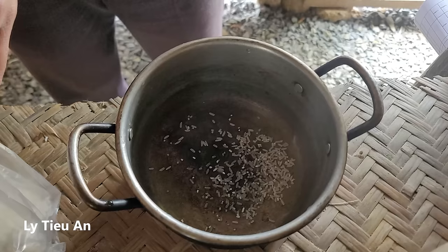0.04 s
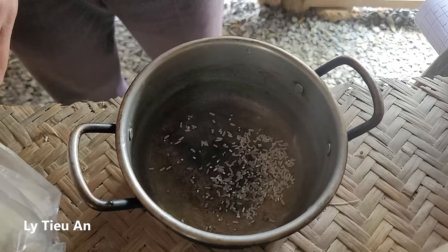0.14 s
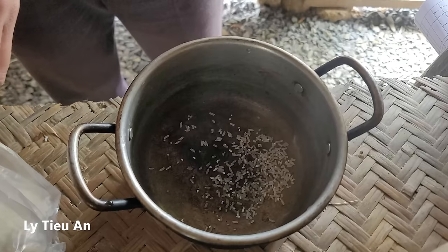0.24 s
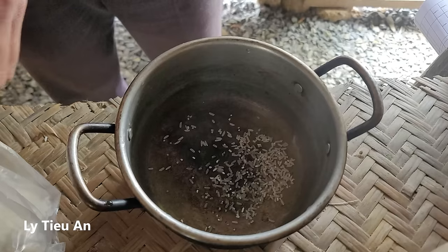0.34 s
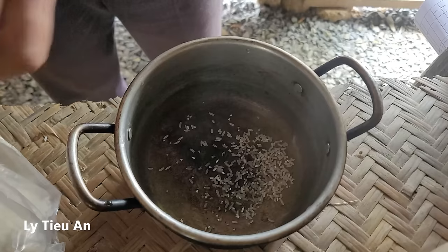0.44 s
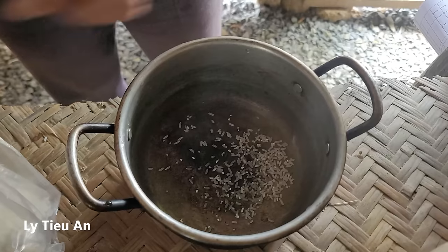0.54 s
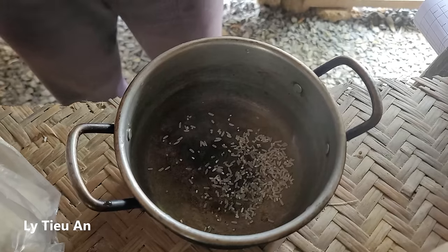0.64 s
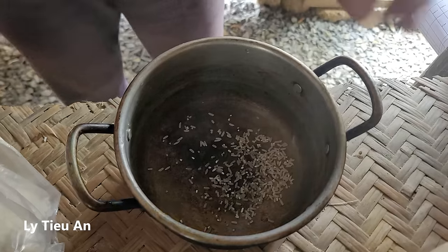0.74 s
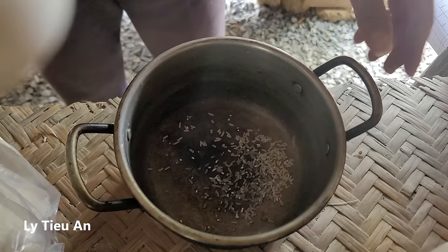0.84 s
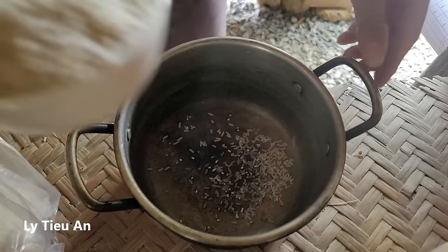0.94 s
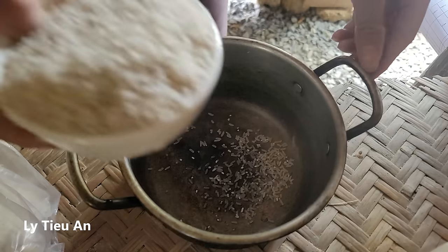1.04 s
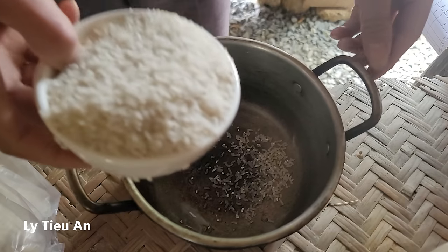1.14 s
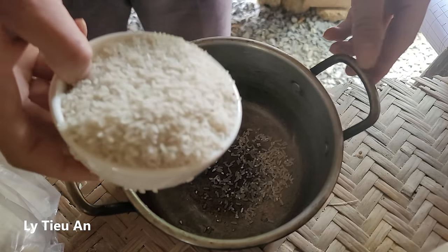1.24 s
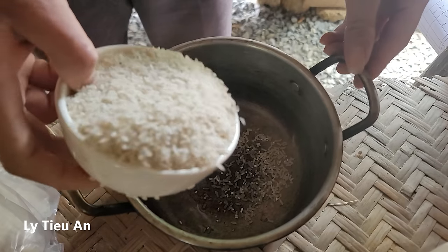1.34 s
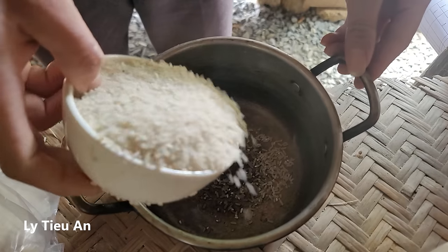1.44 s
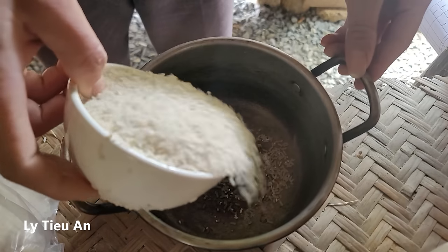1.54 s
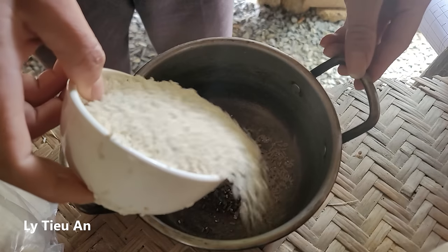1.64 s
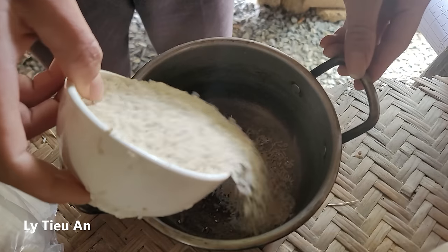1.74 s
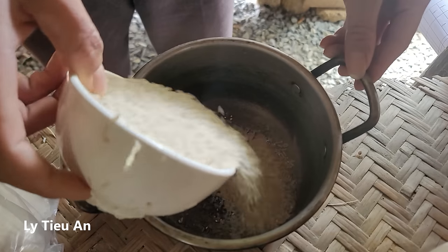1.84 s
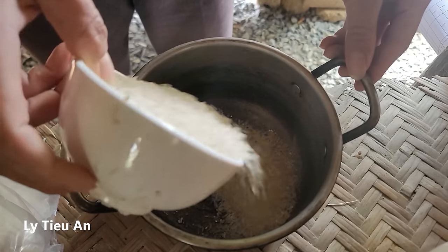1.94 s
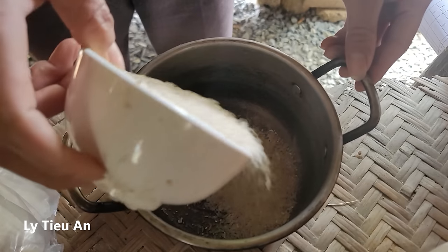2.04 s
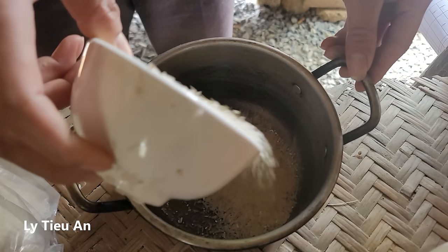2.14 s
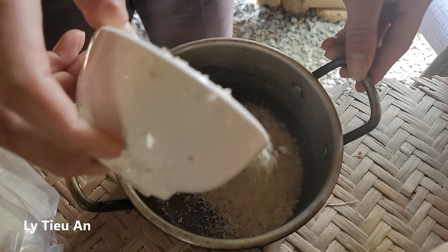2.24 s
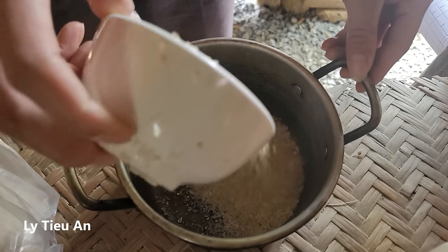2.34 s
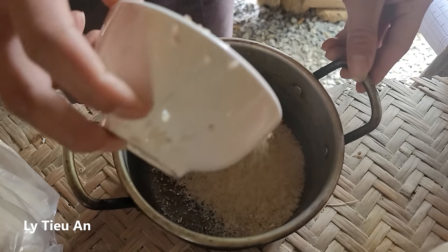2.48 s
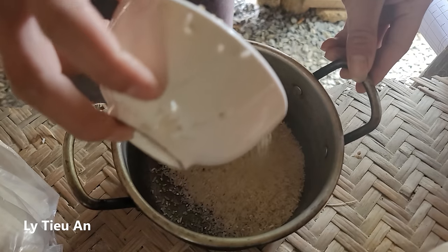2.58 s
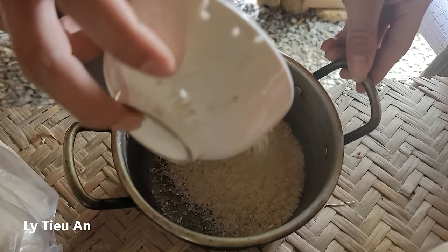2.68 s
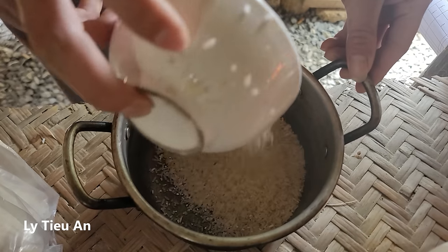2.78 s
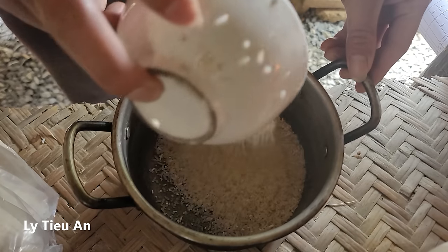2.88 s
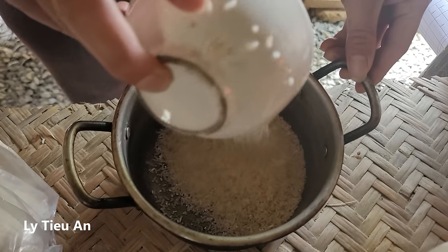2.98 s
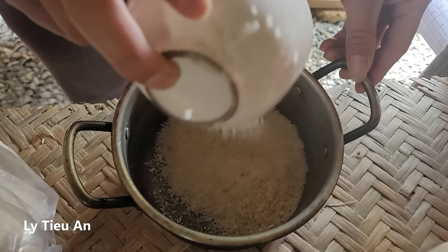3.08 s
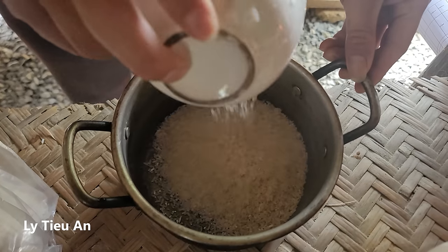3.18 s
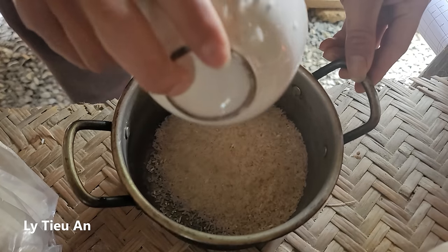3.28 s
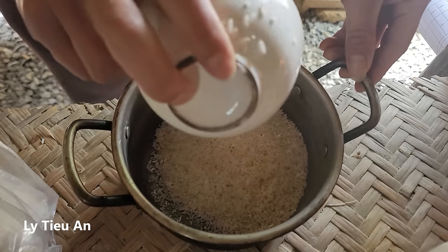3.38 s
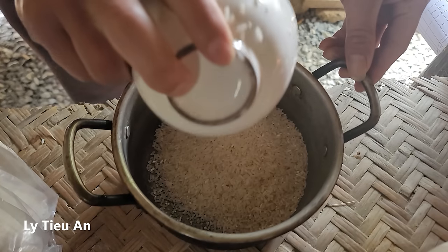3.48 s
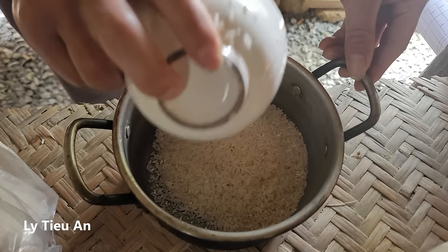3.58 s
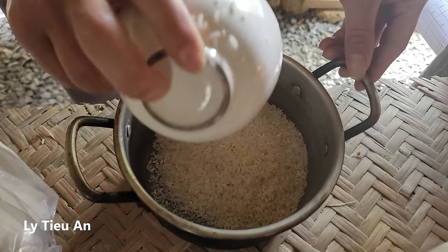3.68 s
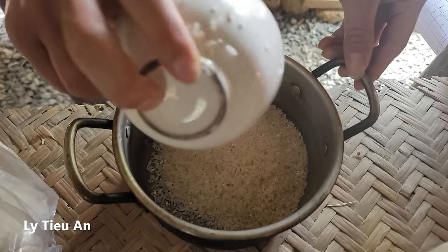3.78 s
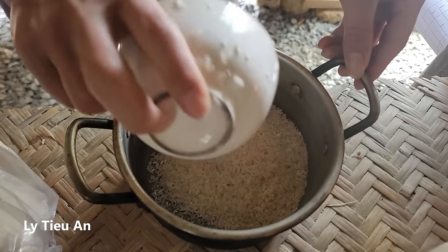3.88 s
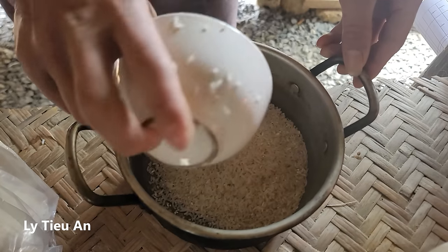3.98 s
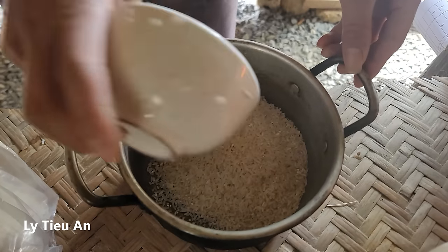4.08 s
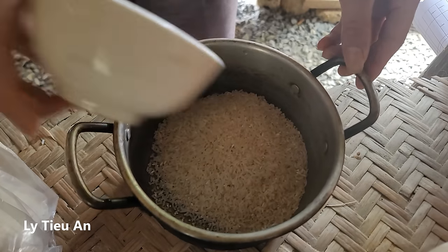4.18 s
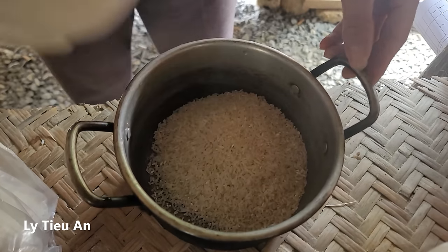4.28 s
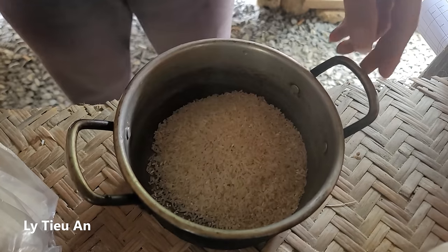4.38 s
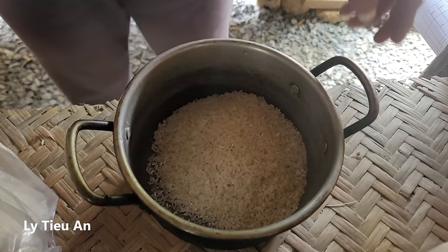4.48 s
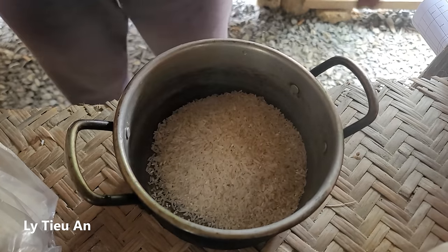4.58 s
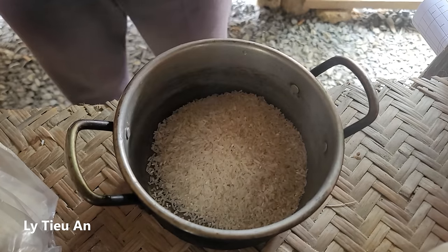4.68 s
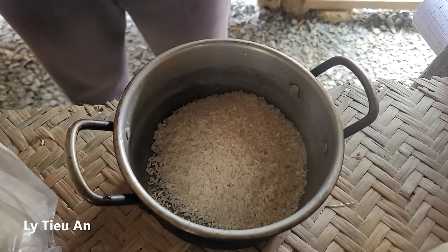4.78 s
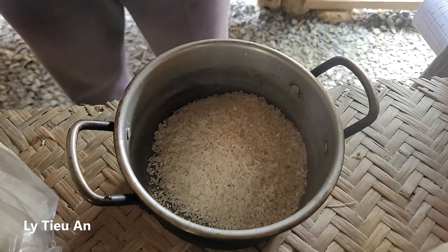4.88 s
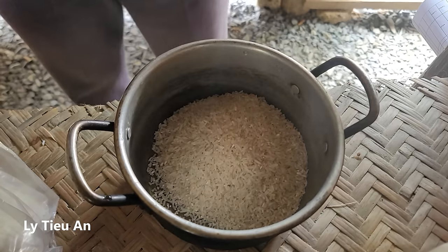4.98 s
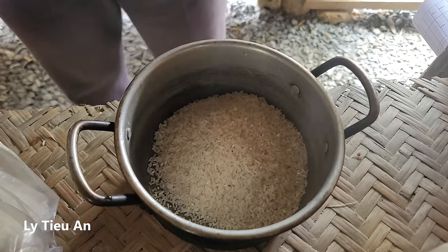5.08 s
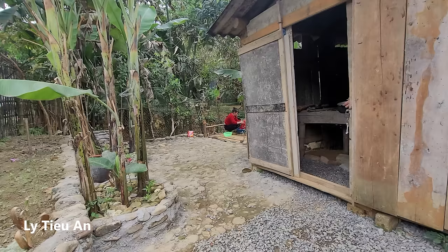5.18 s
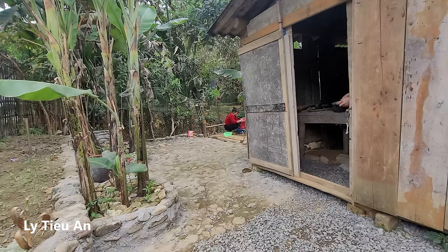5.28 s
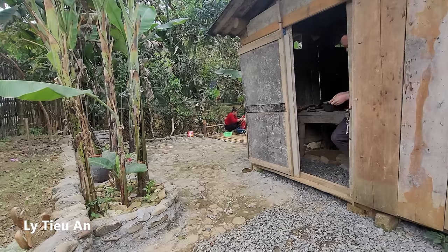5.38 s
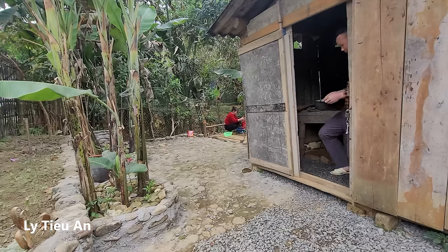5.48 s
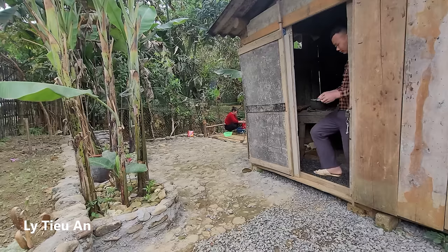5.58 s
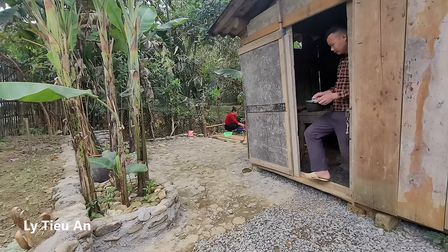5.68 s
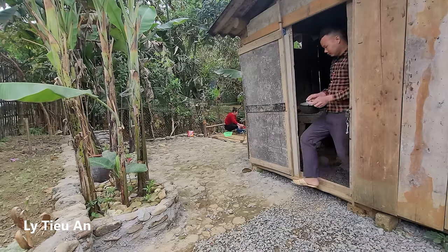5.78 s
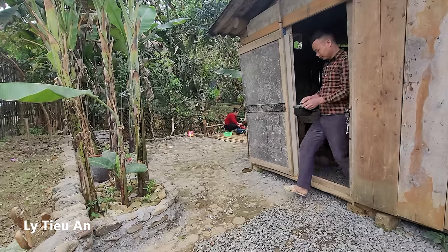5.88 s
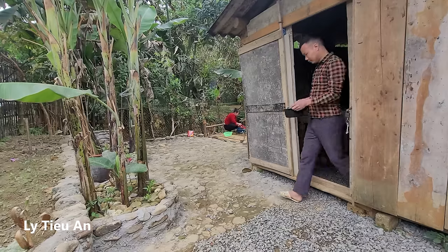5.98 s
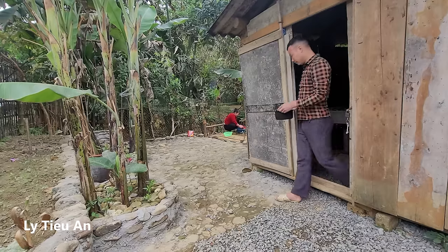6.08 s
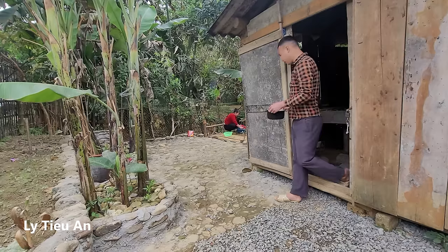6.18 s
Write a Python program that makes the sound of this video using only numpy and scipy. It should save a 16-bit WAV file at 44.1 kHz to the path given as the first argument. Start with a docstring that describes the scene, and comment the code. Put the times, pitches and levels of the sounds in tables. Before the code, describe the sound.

From 0 to 1.4 s, a quiet wooden hut: low wavering rumble, thin air, tiny rustling ticks, faint far hoots and a distant bird repeating a thin whistle and hoarse note. A dull table knock comes at 1.35 s. At about 1.45 s dry rice strikes bare thin metal, a loud, bright, ringing rush peaking near 1.6 s and fading by 2.1 s. From 2.3 to 3.5 s the metal is muffled; crisp grain-on-grain ticks and small clumps patter unevenly, with a stronger soft knock at 2.7 s, then trickle to stray grains. From 3.6 to 4.6 s, close hand and bowl clicks, light rustles, and faint knocks; another bird call at 3.6 s. Quiet follows, with a bird near 5.05 s. After a tiny silent gap at 5.2 s, the yard opens with heavier rumble; a clicking, scuffing step lands on the sill around 5.96 s. Close stereo, short dry echo.

```python
"""Dry rice rattles into a thin metal pot: it rings the bare bottom, then ticks on the growing heap and trickles out.
Hands rustle, dull knocks come through the table, and far birds call over a low rumble in a wooden hut.
After a short silence the yard outside is heard, with more rumble and a step on the sill.
Rice is random landings blurred into crackle, coloured as metal or heap; handling and knocks are noise bursts through
resonances; calls are narrow swells of noise; the background air is wavering filtered noise."""
import sys
import numpy as np
from scipy import signal
from scipy.fft import rfft, irfft, next_fast_len
from scipy.io import wavfile
from scipy.ndimage import uniform_filter1d

SR = 44100
rng = np.random.default_rng(int(sys.argv[2]) if len(sys.argv) > 2 else 0)


def log_audio(samples):
    """Write samples as a 16-bit WAV file to the path given in sys.argv[1]."""
    # one column per channel
    frames = np.atleast_2d(samples).T
    # limit to full scale, then quantise
    limited = np.clip(frames, -1, 1)
    pcm = np.round(limited * 32767).astype(np.int16)
    wavfile.write(sys.argv[1], SR, pcm)


N = 274698

# the rice stream: (time [s], level on bare metal [dB], level on the heap [dB])
POUR = [(1.505, -44, -38.5), (1.53, -25.5, -24), (1.59, -19, -20.5), (1.726, -20.5, -22),
        (1.785, -25.5, -27), (1.88, -28, -31), (1.925, -29.5, -26.5), (2.004, -36, -38.5),
        (2.095, -40, -57), (2.17, -39, -35.5), (2.33, -44, -38), (2.53, -47, -41.5), (2.7, -50, -32.5),
        (2.8, -49.5, -38), (2.92, -49, -38.5), (3.0, -50, -31.5), (3.206, -51, -33), (3.27, -59.5, -42.5),
        (3.33, -52.5, -32.5), (3.4, -58, -34.5), (3.46, -79, -62)]


def undb(db):
    """Decibels to gain."""
    return 10 ** (np.asarray(db) / 20)


def unit(x):
    """Scale to rms 1."""
    return x / np.sqrt(np.mean(x ** 2))


def curve(table):
    """Columns of a table, interpolated for every sample."""
    s, *columns = np.transpose(table)
    return [np.interp(np.arange(N) / SR, s, c) for c in columns]


def colour(x, points):
    """Shape by a spectrum of (frequency [Hz], gain [dB]) points."""
    hz, db = np.transpose(points)
    size = next_fast_len(x.shape[-1])
    f = np.maximum(np.arange(size // 2 + 1) * SR / size, 1)
    gain = undb(np.interp(np.log(f), np.log(hz), db))
    return irfft(rfft(x, size) * gain, size)[..., :x.shape[-1]]


def band(x, hz, width):
    """Two-pole resonance, gain 1 at the centre."""
    centre = min(hz, .45 * SR)
    return signal.lfilter(*signal.iirpeak(centre, hz / width, fs=SR), x)


def ring(x, modes):
    """Sum of resonances, alternate in sign."""
    return sum((-1) ** k * undb(db) * band(x, hz, width) for k, (hz, width, db) in enumerate(modes))


def split(x, hz):
    """Lower and upper part."""
    return [signal.sosfilt(signal.butter(4, hz, kind, fs=SR, output="sos"), x) for kind in ("low", "high")]


def pair(size, alike):
    """Noise for two microphones with a given likeness."""
    mid, side = rng.standard_normal((2, size))
    opposite = np.array([[1], [-1]])
    return np.sqrt((1 + alike) / 2) * mid + np.sqrt((1 - alike) / 2) * side * opposite


def panned(pan_db):
    """Left and right gains for a left minus right difference in dB."""
    return undb(np.array([pan_db, -pan_db]) / 2)


def add(out, s, x):
    """Mix a short sound in at a time."""
    i = int(s * SR)
    out[:, i:i + x.shape[1]] += x[:, :N - i]


def walk(rate):
    """Random levels held 1 / rate s and smoothed twice into a slow drift."""
    k = int(SR / rate)
    held = np.repeat(rng.standard_normal(N // k + 1), k)
    return 1.14 * uniform_filter1d(uniform_filter1d(held, k), k)[:N]


def span(start, end, fade_s):
    """On between two times, with short fades."""
    t = np.arange(N) / SR
    return uniform_filter1d(1. * ((t >= start) & (t <= end)), int(fade_s * SR))


def shower(per_s, spread_db):
    """Random landings, many small and a few large."""
    when, size = rng.random((N, 2)).T
    return (when < per_s / SR) * undb(-spread_db * np.log(1 - size))


def rattle(hits, decay_s):
    """Each hit becomes a brief crackle: a grain lands, rocks and nudges its neighbours."""
    pole = np.exp(-1 / (decay_s * SR))
    softened = signal.lfilter([1 - pole], [1, -pole * 0.3], hits)
    return signal.lfilter([1], [1, -pole], softened) * pair(N, 0.025)


def background(start, end, calm_db, low, air):
    """Deep bass swells and rumble, mostly alike on both sides, and a murmur of bands that waver separately."""
    # swells of the deep bass: (time [s], level [dB], time from centre to 1/e of the power [s])
    deep_swells = [(0.406, -52.5, 0.043), (0.553, -56, 0.052), (1.005, -50, 0.037), (1.184, -55, 0.034),
                   (1.403, -57.5, 0.068), (1.873, -53.5, 0.097), (2.063, -60, 0.061), (2.446, -54.5, 0.18),
                   (2.747, -56, 0.1), (3.105, -53.5, 0.12), (3.58, -70, 0.08), (5.433, -50.5, 0.09),
                   (5.723, -53.5, 0.08), (6.08, -58, 0.08)]
    # background air, its murmur swelling while the rice pours: (time [s], murmur level [dB], rumble level [dB])
    air_levels = [(0, -67, -61), (.5, -63.5, -57.5), (.95, -65.5, -59.5), (1.4, -64, -57.5),
                  (2.2, -58.5, -56), (3.2, -59.5, -57.5), (3.6, -63, -57.5), (4.4, -62.5, -59),
                  (5.0, -66.5, -62.5), (5.25, -63, -53), (5.7, -62, -52), (6, -59, -53.5),
                  (6.23, -62.5, -49.5)]
    t = np.arange(N) / SR
    swell_power = sum(undb(db) ** 2 * np.exp(-((t - s) / half) ** 2) for s, db, half in deep_swells)
    swells = np.sqrt(undb(calm_db) ** 2 + swell_power)
    murmur_db, rumble_db = curve(air_levels)
    deep, rumble = split(colour(pair(N, 0.89), low), 95)
    deep = unit(deep) * swells * undb(walk(5.1)) * panned(2.7)[:, None]
    rumble = unit(rumble) * undb(rumble_db + 1.6 * walk(9))
    flicker_db = 2.5
    centres_hz = 250 * 2 ** (np.arange(25) / 4)
    # the higher the band, the less alike the two sides
    murmur = sum(band(pair(N, min(250 / hz, .7)), hz, hz / 6) * undb(flicker_db * walk(22)) for hz in centres_hz)
    murmur = unit(colour(murmur, air)) * undb(murmur_db + walk(9.9))
    return (deep + rumble + murmur) * span(start, end, 0.0074)


def faint_ticks():
    """Small bright ticks now and then, from the mat and from clothes: sparse crackles with the lows removed."""
    ticks_per_s, level_db = 10, -61
    return undb(level_db) * split(rattle(shower(ticks_per_s, 3), .004), 4500)[1]


def far_note(length, hz, width, db):
    """A far note, blurred by leaves into a narrow swell of noise."""
    t = np.linspace(0, 1, int(length * SR))
    noise = band(band(pair(len(t), 0.2), hz, width), hz, width)
    return undb(db) * unit(noise) * np.sqrt(np.sin(np.pi * t ** 0.57))


def calls():
    """A far bird repeats a thin whistle and then a hoarse, wider-band note; faint low hoots sound far away."""
    # the two-note call: (time [s], level [dB])
    bird = [(0.172, -64), (0.6, -65), (1.036, -68.5), (3.59, -65.5), (5.04, -60.5)]
    # low hoots: (time [s], length [s], frequency [Hz], level [dB])
    hoots = [(0.299, 0.043, 846, -61.5), (0.714, 0.093, 1000, -63.5), (1.051, 0.12, 1410, -66),
             (0.878, 0.14, 923, -71), (1.175, 0.12, 910, -69), (1.398, 0.056, 900, -65),
             (3.491, 0.046, 1015, -61)]
    whistle_s, whistle_hz, whistle_width_hz, whistle_db = 0.075, 6200, 90, -12
    hoarse_s, hoarse_hz, hoarse_width_hz, hoarse_late_s = 0.1, 3470, 1000, 0.038
    out = np.zeros((2, N))
    for s, db in bird:
        add(out, s, far_note(whistle_s, whistle_hz, whistle_width_hz, db + whistle_db))
        add(out, s + hoarse_late_s, far_note(hoarse_s, hoarse_hz, hoarse_width_hz, db))
    for s, length, hz, db in hoots:
        add(out, s, far_note(length, hz, 81, db))
    return out


def knocks():
    """Dull knocks: a rough push on the woven table rings its few low modes."""
    # pushes: (time [s], level [dB], decay time constant [s])
    pushes = [(1.347, -43, 0.034), (2.722, -35.5, 0.034), (4.154, -49, 0.015), (4.524, -55, 0.038),
              (5.961, -49.5, 0.041)]
    # table modes: (frequency [Hz], width [Hz], level [dB])
    table_modes = [(130.3, 44, 6), (231, 32, 4.5), (345.4, 60, 2), (473, 170, -2.5), (667, 24, 5),
                   (883, 100, -11), (1077, 120, -8.5), (1390, 44, -10), (1940, 550, -21)]
    out, t = np.zeros((2, N)), np.arange(int(.25 * SR)) / SR
    for s, db, decay_s in pushes:
        shape = np.minimum(t / 0.0033, 1) * np.exp(-t / decay_s)
        add(out, s, undb(db) * unit(ring(pair(len(t), 0.7), table_modes)) * shape)
    return out


def handling():
    """Each touch is a sharp bright tick with a duller ring and a short crackling rustle."""
    # stray grains, hands, bowl and feet:
    # (time [s], bright level [dB], dull frequency [Hz], dull level [dB], left minus right [dB])
    touches = [(0.4005, -56.5, 1010, -69, 10), (0.4506, -56, 1020, -80, -3),
               (0.5695, -47.5, 3770, -53.5, -7), (1.0325, -57, 1080, -48, -1),
               (1.1402, -46.5, 1050, -48, -2), (1.2733, -59, 953, -74, 1.5), (3.6697, -49.5, 3240, -59, 0),
               (3.723, -53, 2110, -62, -7), (3.8446, -47.5, 1350, -58, -3), (3.9, -45.5, 3480, -59, -7),
               (4.0174, -51, 1133, -55, -2), (4.0656, -62.5, 3140, -53, 2),
               (4.1584, -45.5, 1600, -45.5, 0.5), (4.276, -46, 3750, -68, 5), (4.3244, -50, 1670, -63, -1),
               (4.3516, -47, 1390, -51.5, -1), (4.4176, -51.5, 2490, -58.5, -3),
               (4.6302, -39, 1080, -52.5, -3), (4.978, -57, 1061, -65, -6.5), (5.52, -54, 1370, -57, -1),
               (5.9604, -54, 999, -66, -5.5), (5.9783, -41.5, 4300, -66, 6), (5.984, -43, 1440, -46.5, -6),
               (6.001, -59, 2640, -55, 3), (6.021, -63, 4760, -52, 2), (6.0378, -64, 1620, -43.5, -1)]
    rustle_share, rustle_t60_s = 0.39, 0.14
    out, t = np.zeros((2, N)), np.arange(int(.2 * SR)) / SR
    for s, db, hz, dull_db, pan in touches:
        # loudness jumps every 100 samples
        crackle = undb(3 * np.repeat(rng.standard_normal(len(t) // 100 + 1), 100)[:len(t)])
        rustle = rustle_share * undb(-60 * t / rustle_t60_s) * crackle
        shape = np.exp(-t / 0.0012) + rustle
        bright = band(split(pair(len(t), 0.078), 2340)[1], 4900, 9400)
        dull = band(band(pair(len(t), 0.32) * shape, hz, 0.79 * hz), hz, 0.79 * hz) * np.sqrt(SR / hz)
        add(out, s, (undb(db) * bright * shape + undb(dull_db) * dull) * panned(pan)[:, None])
    return out


def bare(t):
    """Share of the pot's bottom that rice has not yet covered, falling exponentially."""
    cover_s = 0.31
    return np.exp(-np.maximum(t - POUR[0][0], 0) / cover_s)


def on_metal(x):
    """The pot's broad clang with its plate modes on top; the lowest modes reach both microphones much alike."""
    # plate modes: (frequency [Hz], width [Hz], level [dB])
    plate_modes = [(1304, 77, -2.5), (2230, 150, 0), (2850, 180, -2), (3600, 270, -0.5), (4300, 56, -4),
                   (5264, 61, 0), (6465, 56, -0.5)]
    # spectrum of the clang: (frequency [Hz], gain [dB])
    metal_colour = [(350, -65.5), (600, -42), (981, -11.5), (1320, -5.5), (1740, -6.5), (2170, -1.5),
                    (2520, -9.5), (3220, -10.5), (3540, -3), (3900, -5.5), (5410, -2.5), (8150, -8),
                    (9220, -2.5), (15700, -4)]
    alike_below_hz = 1570
    low, high = split(colour(x * undb(-8.0) + ring(x, plate_modes), metal_colour), alike_below_hz)
    return high + 0.54 * low + .5 * low.sum(axis=0)


def on_heap(x):
    """Bright ticks of grain on grain, split in a lower and an upper part."""
    # spectrum of the ticks: (frequency [Hz], gain [dB])
    heap_colour = [(1760, -56.5), (3000, -34.5), (5970, -15), (6910, -7), (7460, -11.5), (8340, -5),
                   (9710, -5.5), (14600, 2), (15800, 1)]
    return split(colour(x, heap_colour), 8000)


def rice():
    """The stream and the single grains strike metal, then heap, as rice hides the bottom and muffles its ring."""
    # loudest single grains and clumps: (time [s], level [dB], left minus right [dB])
    loud_drops = [(1.45, -19, -3.5), (1.492, -12.5, 2.5), (1.531, -15.5, -1), (2.3555, -27, 10),
                  (2.4, -21.5, 12), (2.412, -24, -1), (2.42, -20, 7), (2.4723, -25.5, 6), (2.558, -24, 10),
                  (2.573, -21, 1), (2.607, -18.5, 1), (2.656, -26, 8), (2.6934, -24, 1), (2.727, -19, 1.5),
                  (2.835, -14.5, 7.5), (2.88, -25, 6), (2.9532, -25, 10), (2.988, -16, 9),
                  (3.0076, -16.5, 10), (3.027, -20, 6), (3.041, -21, 11), (3.062, -15.5, 4),
                  (3.101, -24.5, 6), (3.169, -19.5, 4), (3.2944, -32, 1), (3.321, -22, -2),
                  (3.3932, -31, 1), (3.4024, -23.5, -3), (3.417, -29, 6), (3.4463, -28.5, -1),
                  (3.4974, -27, 2), (3.523, -23.5, 3), (3.533, -29, 4), (3.8143, -27, 3), (3.8455, -40, -2),
                  (4.182, -36.5, 2)]
    # modes of the covered bottom: (frequency [Hz], width [Hz], level [dB])
    muffled_modes = [(725, 130, 0), (1342, 82, 5.5), (2050, 330, -9.5)]
    patter_bare_db, patter_covered_db = -44, -7.5  # muffled patter against the clang
    low_ticks_db, low_ticks_bare_db = -26.5, 9  # lower against upper ticks; extra while the bottom is bare
    deepen_db_per_s, deepens_s = 15, 2.31  # the lower ticks grow with the heap from this time
    drop_s, drop_bare_db, drop_covered_db = 0.0028, 4.5, -32  # drop length; its share that reaches the metal
    metal_db, heap_db = curve(POUR)
    time = np.arange(N) / SR
    patter_db = metal_db + patter_covered_db + (patter_bare_db - patter_covered_db) * bare(time)
    deeper_db = low_ticks_db + deepen_db_per_s * np.maximum(time - deepens_s, 0) + low_ticks_bare_db * bare(time)

    # a louder stream holds more grains, so it blurs into a smoother rush
    crowd = undb(np.clip(0.59 * (heap_db + 38.5), 0, 14))
    low, high = on_heap(rattle(shower(1000 * crowd, 3.2), .0014) / np.sqrt(crowd))
    ticks = unit(high) + unit(low) * undb(deeper_db)
    clang = unit(on_metal(rattle(shower(3945, 1.0), 0.0015)))
    patter = unit(ring(rattle(shower(760.0, 1.54), 0.00096), muffled_modes))
    stream = clang * undb(metal_db) + ticks * undb(heap_db) + patter * undb(patter_db)
    stream = stream * span(POUR[0][0], POUR[-1][0], .01) * panned(0.25)[:, None]

    heap, metal = np.zeros((2, 2, N))
    t = np.arange(int(.04 * SR)) / SR
    for s, db, pan in loud_drops:
        # a clump lands over a few milliseconds
        shape = (t / drop_s) ** .45 * np.exp(-(t / drop_s) ** 1.5) * panned(pan)[:, None]
        metal_share_db = drop_covered_db + (drop_bare_db - drop_covered_db) * bare(s)
        add(heap, s, undb(db) * shape)
        add(metal, s, undb(db + metal_share_db) * shape)
    low, high = on_heap(heap * pair(N, 0.018))
    # the drops' lower ticks follow those of the stream at half the dB range
    depth = undb(np.clip(.5 * (deeper_db + 14), -8, 0))
    return stream + high + depth * low + on_metal(metal * pair(N, 0.071))


def scene():
    """Near sounds with the hut's short echo of decaying noise, over the hut's and then the yard's background."""
    # murmur spectra of hut and yard: (frequency [Hz], gain [dB])
    hut_air = [(150, -32), (250, -12), (313, -13), (708, -13.5), (1740, -19.5), (4380, -24), (5680, -28.5),
               (8460, -28.5), (9720, -36.5), (14500, -31), (15800, -39)]
    yard_air = [(150, -42.5), (250, -25.5), (385, -1.5), (681, -9), (1360, -11), (1820, -12.5), (4170, -15),
                (4790, -17.5), (8470, -21), (9720, -25), (15500, -25)]
    # spectra of their deep bass and rumble: (frequency [Hz], gain [dB])
    hut_low = [(12, -42), (20, -11), (59, 0.5), (125, -7), (184, 2), (204, -5), (229, -1), (249, -12.5),
               (330, -29.5), (430, -52.5), (730, -120)]
    yard_low = [(12, -39), (20, -18), (43, -1), (113, -2.5), (211, -3), (224, -15), (238, -21), (287, -16),
                (330, -18), (430, -25), (730, -120)]
    hut_end_s, yard_start_s, end_s = 5.21, 5.245, N / SR
    hut_calm_db, yard_calm_db = -71, -59.5  # deep bass between swells
    room_t60_s, room_db = 0.078, -14
    ticks = faint_ticks()
    hut = background(0, hut_end_s, hut_calm_db, hut_low, hut_air)
    hut += ticks * span(0, hut_end_s - .02, .004)
    yard = background(yard_start_s, end_s, yard_calm_db, yard_low, yard_air)
    yard += ticks * span(yard_start_s, end_s, .004)
    near = knocks() + handling() + rice()
    t = np.arange(int(.3 * SR)) / SR
    tail = rng.standard_normal((2, len(t))) * undb(-60 * t / room_t60_s) * (t > .003)
    echo = signal.fftconvolve(near, tail / np.sqrt(np.sum(tail[0] ** 2)), axes=1)[:, :N]
    return hut + yard + calls() + near + undb(room_db) * echo


def record(dry):
    """The microphone ports resonate in a few treble bands; the camera cuts the top."""
    # port resonances: (frequency [Hz], width [Hz], level [dB])
    ports = [(9220, 103, -8.5), (10500, 220, -9), (15100, 700, -12)]
    top_hz = 15720
    dry = dry + sum(undb(db) * band(dry, hz, width) for hz, width, db in ports)
    return signal.sosfilt(signal.ellip(16, .3, 85, top_hz, fs=SR, output="sos"), dry)


dry = scene()
out = record(dry)
log_audio(out)
```